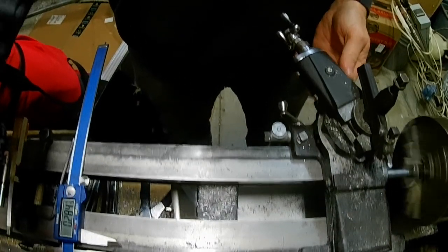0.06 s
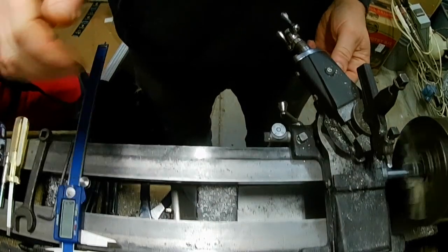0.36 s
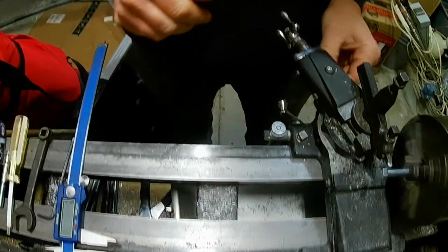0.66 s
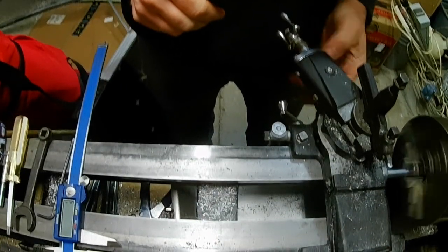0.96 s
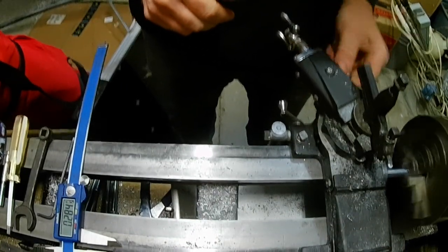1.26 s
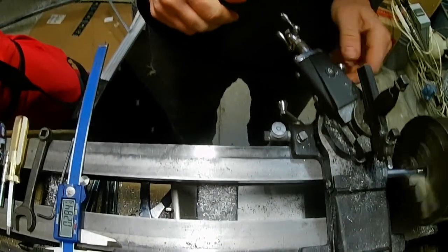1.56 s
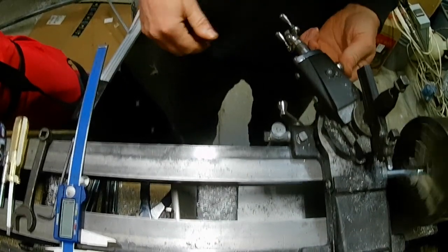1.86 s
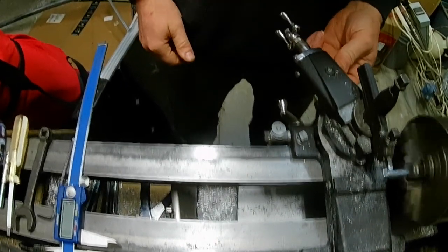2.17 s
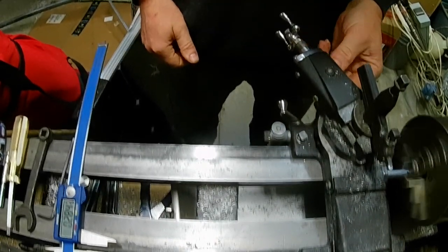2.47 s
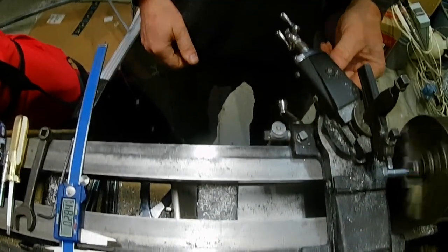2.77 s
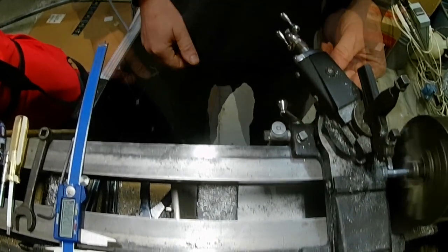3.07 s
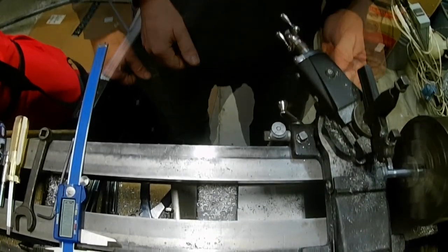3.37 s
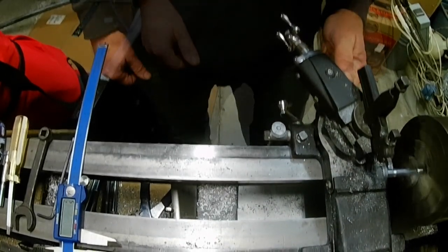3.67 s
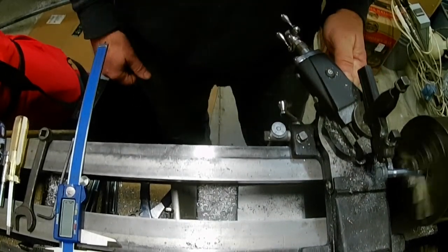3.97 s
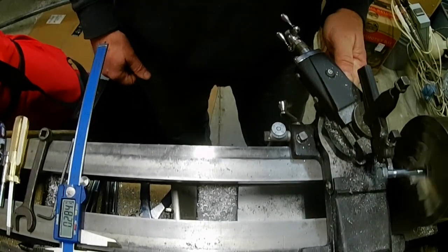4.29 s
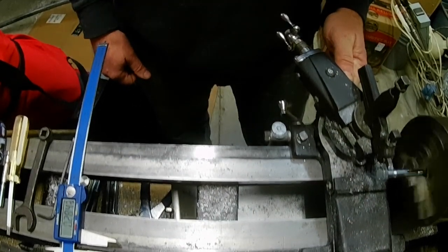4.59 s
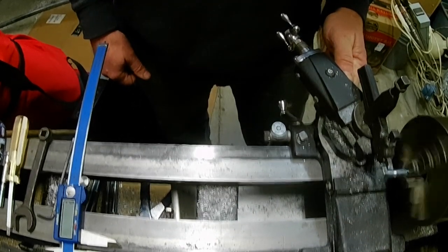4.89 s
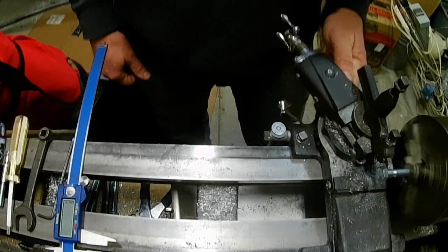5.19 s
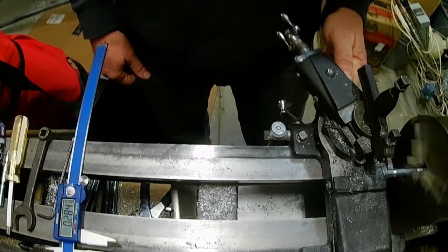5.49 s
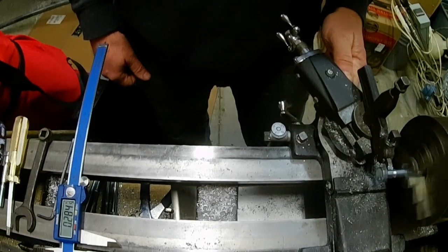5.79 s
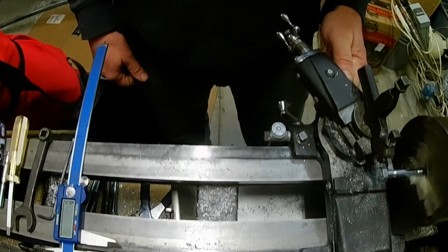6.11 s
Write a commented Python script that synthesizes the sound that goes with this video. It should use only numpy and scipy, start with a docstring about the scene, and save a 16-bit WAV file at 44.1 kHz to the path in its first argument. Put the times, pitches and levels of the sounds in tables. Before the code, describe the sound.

A belt-driven metal lathe runs for the whole six seconds or so in a small workshop, heard almost only on the left with a short, slight echo. From the start, the motor hums and whines beneath a fast, pulsing, boomy gear rattle. Irregular knocks, pings and bright ticks come through, the belt slaps about five times a second with a brief ringing chirp, and the bearings add a thin, high ring. From about 2.5 seconds, metal begins to rub, adding a hiss and a rough, falling squeak that repeats six or seven times a second. Between roughly 2.7 and 4 seconds, the boom and ticking recede and the rattle becomes duller. From 4 seconds the swishing rub and squeaks are stronger, with occasional gear clanks, clearest near 4.6 and 5.6 seconds. The lathe is still running at the end.

```python
"""A belt-driven metal lathe runs in a small workshop, heard almost only on the left.
From the start the motor hums and whines, and its pulsing pull and the turning shafts rattle the gears
in the cast metal bed. Bearings ring; the belt slaps once a lap and sets its pulley ringing.
From about 2.5 s something rubs, adding a hiss and a repeating, falling squeak. By about 4 s the boomy,
ticking first part has blended into a duller, squeaking second part, where a gear wheel clanks at times."""
import sys
import numpy as np
from scipy import signal
from scipy.fft import rfft, irfft, next_fast_len
from scipy.io import wavfile

SR = 44100
rng = np.random.default_rng(int(sys.argv[2]) if len(sys.argv) > 2 else 0)


def store_wav(level_fs):
    """Save 16-bit WAV to argv[1]."""
    pcm = np.round(np.clip(np.atleast_2d(level_fs), -1, 1) * 32767)
    wavfile.write(sys.argv[1], SR, pcm.T.astype(np.int16))


N = 275625
T = np.arange(N) / SR

# Things that turn. The high spot is the point of each turn that pushes hardest; the offset is how far
# the beat shifts between the two parts. Columns: turn_rate_hz, high_spot_s, second_part_offset_turns
MOTOR = (29.77, 1.3, .5)
COUNTERSHAFT = (24.38, 1.3, .17)
SPINDLE = (8.15, 1.283, .47)
BELT = (5.39, 1.21, 0)
RIPPLE_HZ = 120  # how often the motor's pull pulses
CONTACT_S = (2.46, 3.08)  # when the rubbing takes hold
BLEND_S = (2.7, 3.9)  # when the first part blends into the second

# All levels in the tables are relative: the functions scale them further.
# How strongly the gears rattle: time_s, level_db
RATTLE_LEVELS = [(0, -27), (2.6, -26.5), (3.05, -31), (3.8, -33), (4.03, -28.5), (6.25, -28.5)]
# Brief changes in the rattle, mostly swells: time_s, boost_db
RATTLE_SURGES = [(.062, 1.5), (.151, 1.5), (.452, 4), (1.06, 1), (1.467, 2.5), (1.578, 2), (1.665, -0.5),
                 (2.12, 1), (2.207, 2), (2.45, 2), (2.613, 5), (2.681, -0.5), (3.247, 2), (4.015, 2),
                 (4.3, 3), (4.38, 2), (5.002, 2.5), (5.039, 3), (5.408, 0.5), (6.075, 3), (6.144, -0.5)]
# The hardest gear knocks: start_s, level_db, decay_s
GEAR_KNOCKS = [(0.314, -18, .002), (.465, -17, 0.0017), (.649, -11, 0.0037), (.683, -11, 0.0034),
               (.849, -20, 0.0018), (.925, -11.5, .004), (1.039, -12, .002), (1.091, -12, 0.003),
               (1.257, -9, 0.0019), (1.423, -20, 0.0017), (1.572, -12.5, 0.0018), (1.7585, -12.5, 0.004),
               (1.7906, -13, 0.0034), (1.958, -11.5, 0.0018), (2.199, -9.5, 0.0061), (2.358, -14, 0.0037),
               (2.367, -10.5, 0.0046), (2.666, -13.5, 0.0033), (3.033, -16, 0.0024), (3.065, -15.5, 0.0045),
               (3.887, -20, 0.0017), (4.215, -18, .002), (4.592, -20, 0.0019), (4.792, -15.5, 0.0024),
               (5.7, -14, 0.0041), (6.138, -19, 0.0019)]
# How well the lathe's metal body passes on each pitch: pitch_hz, level_db
BED_COLOUR = [(25, -57.5), (60, -50.5), (100, -31.5), (140, -26.5), (300, -19.5), (450, -11), (520, -4),
              (900, -3.5), (1100, -0.5), (1400, -6.5), (2300, -9.5), (2900, -24.5), (5200, -38),
              (7200, -56), (10000, -70.5), (15000, -87)]
# Pitches that the body lifts or dips: pitch_hz, width_hz, boost_db
BED_MODES = [(243, 16, 7), (342, 11, 5), (524, 62, 3.5), (605.5, 21, 6), (990, 25, 5.5), (1211, 62, -4.5),
             (1254, 98, 10.5), (1700, 36, 0.5), (1920, 70, -3), (4730, 180, -7.5), (4860, 150, 10)]
# The broad boom of the stand in the first part: pitch_hz, width_hz, boost_db
STAND_MODES = [(126, 170, 7.5), (730, 490, 4)]
# The ringing notes of one gear wheel: pitch_hz, width_hz, level_db
WHEEL_MODES = [(1016, 45, -3), (1115, 43, 0)]
# That wheel's clanks in the second part: time_s, level_db
WHEEL_CLANKS = [(2.806, -25.5), (3.511, -21), (3.752, -28), (4.085, -25), (4.291, -32), (4.62, -21),
                (4.865, -27), (5.36, -29), (5.4, -26), (5.567, -24), (5.633, -20.5), (6.066, -33),
                (6.139, -24)]
# The clearest pings of a loose piece: start_s, level_db
LOOSE_PINGS = [(.182, -27), (.224, -24), (.484, -28.5), (.516, -26), (.726, -26), (1.059, -28.5),
               (1.332, -26.5), (1.499, -24.5), (1.698, -25), (2.029, -26.5)]
# Lone bright ticks: start_s, level_db
LONE_TICKS = [(.117, -31.5), (1.17, -27.5), (1.538, -29.5), (2.238, -44), (2.276, -28), (2.507, -29),
              (2.646, -31.5)]
# The tone colour of a tick: pitch_hz, level_db
TICK_COLOUR = [(700, -23.5), (1600, 10.5), (2700, 6.5), (3300, -5), (4000, -9), (5500, -22), (8000, -39.5),
               (12000, -73)]
# Pitches that ring in a tick: pitch_hz, width_hz, boost_db
TICK_MODES = [(1830, 89, 3.5), (2600, 240, 0.5), (3170, 33, 7), (4200, 130, 3.5), (5300, 130, 10)]
# Hard slaps of the belt: start_s, level_db
HARD_SLAPS = [(.158, -27.5), (.326, -20), (.899, -28), (1.093, -29.5), (1.268, -28.5), (1.434, -23.5),
              (1.634, -31.5), (1.799, -29.5), (2.2, -32.5), (2.377, -31), (2.542, -25.5), (2.743, -28.5),
              (2.941, -29.5), (3.242, -26), (4.1, -26), (4.235, -28.5), (4.433, -31), (4.6, -30.5),
              (4.84, -27.5), (5.13, -32), (5.21, -25.5), (5.344, -24)]
# The pulley's notes, each with its time to fade by 60 dB: pitch_hz, level_db, fade_s
PULLEY_MODES = [(1605, -9.5, 0.17), (1880, -13, 0.079), (1953, 2.5, 0.069), (2590, -16, 0.035),
                (3190, -21.5, 0.16), (4312, -28.5, .06), (5140, -27, .07)]
# How strongly the rubbing hisses: time_s, level_db
RUB_LEVELS = [(0, -67.5), (2.35, -69.5), (2.85, -56.5), (3.7, -55.5), (4.1, -50), (5.2, -52.5),
              (6.25, -52.5)]
# The tone colour of that hiss: pitch_hz, level_db
RUB_COLOUR = [(100, -49), (1500, -13.5), (2150, 19), (2380, 15.5), (2550, 9.5), (2850, 5), (3700, -0.5),
              (5000, 0.5), (5800, -3.5), (6300, -8.5), (7100, -9.5), (8400, -2.5), (9100, -25.5),
              (9700, -44), (11000, -42), (12000, -56.5)]
# Pitches that ring in that hiss: pitch_hz, width_hz, boost_db
RUB_MODES = [(3133, 120, 12), (4070, 70, 10), (5250, 110, 7), (6550, 190, 3.5)]
# Squeaks as the tight spot of the rubbing comes round: time_s, level_db, pitch_drop_hz
SQUEAKS = [(2.485, -32, 171), (2.64, -30.5, 169), (2.77, -31, 165), (2.951, -26.5, 190),
           (3.091, -31, 160.7), (3.249, -30, 188.3), (3.4, -30, 182), (3.475, -30.5, 83),
           (3.633, -37, 171.7), (3.796, -28, 199), (3.982, -27, 120.4), (4.105, -25, 208),
           (4.258, -28.5, 169.1), (4.403, -22.5, 161.3), (4.555, -23.5, 149.7), (4.72, -27.5, 240.4),
           (4.874, -25.5, 238.6), (5.031, -25.5, 228.7), (5.185, -30, 152.6), (5.336, -25, 218),
           (5.516, -28, 219.5), (5.65, -31.5, 120.2), (5.71, -31, 203), (5.82, -30, 225),
           (5.947, -30.5, 130), (6.106, -27, 196)]
# The motor's magnetic hum: multiple_of_ripple, level_db
HUM_TONES = [(1, -19.5), (2, 4), (3, -5.5), (4, -4), (6, -2), (7, -3.5)]
# The whine of the slots in the motor's spinning core: ripple_steps_from_centre, level_db
WHINE_TONES = [(-1, 1.5), (0, -0.1), (1, -4.5), (2, -8.5)]
# Faint notes of the gears: pitch_hz, level_db
GEAR_TONES = [(210.2, -15.5), (264.4, -16), (335.6, -10.5), (384.4, -19.5), (509.8, -6), (528.6, -2),
              (1320, -10)]
# The notes of the track that the bearing balls roll in: pitch_hz, width_hz, level_db
BEARING_MODES = [(3970, 75, 1.5), (4120, 29, -7.5), (4207, 50, -4.5), (4298, 36, 8.5), (4390, 55, 0.5)]
# The motor's high whistle near 8 kHz (rows above 10 kHz are too faint to hear):
# pitch_hz, width_hz, level_db
WHISTLE_MODES = [(7810, 16, 0), (8060, 25, -7), (7960, 17, 1.5), (8030, 18, -3.5), (7730, 330, -15),
                 (9050, 200, -24.5), (10600, 110, -31), (11000, 170, -29.5), (12400, 50, -39)]
# The tone colour of the faint hiss on the right: pitch_hz, level_db
RIGHT_HISS_COLOUR = [(30, -39), (100, -24), (300, -6), (1200, -1), (2500, -4.5), (8000, -22), (12000, -38)]


def gears(level_db, clashes_per_s=1200, scatter_db=1.3):
    """Loose teeth clash, hardest when a pulse of the motor meets the high spots of the shafts."""
    shafts = swing(MOTOR, lag_s=0.019) + swing(COUNTERSHAFT)
    ripple = np.cos(2 * np.pi * RIPPLE_HZ * T)
    surge_db = sum(boost * bell(s, width_s=0.012) for s, boost in RATTLE_SURGES)
    push_db = 0.65 * shafts + ripple * (0.8 + 0.35 * shafts) + 0.5 * swing(BELT, lag_s=0.044) + surge_db
    clashes = (rng.random(N) < clashes_per_s / SR) * rng.choice([-1, 1], N)
    clashes = unit(clashes * undb(scatter_db * rng.standard_normal(N)))
    wash = undb(-3) * rng.standard_normal(N)
    rattle = unit(undb(push_db) * (clashes + wash))
    force = undb(level_db) * rattle + undb(-13) * bursts(GEAR_KNOCKS)
    # the boom fades out as the second part blends in
    plain = colour(force, BED_COLOUR, BED_MODES)
    booming = colour(force, BED_COLOUR, BED_MODES + STAND_MODES)
    return blend(T) * plain + (1 - blend(T)) * booming


def gear_wheel(rattle_db, clank_hz=1075):
    """A wheel rings in throbs as the shafts push on it; later its teeth grind in rough clanks."""
    load_db = swing(MOTOR, lag_s=0.02) + 1.5 * swing(COUNTERSHAFT)
    load_db += 5.7 * blend(T) * swing(BELT, lag_s=0.13)
    ringing = unit(undb(load_db) * ring(WHEEL_MODES))
    grind = sum(undb(db) * bell(s + 0.0051, width_s=0.009) for s, db in WHEEL_CLANKS)
    clanks = grind * tone(clank_hz, 0.4 + flutter(130))
    return undb(rattle_db - 10.5) * ringing + undb(-5) * clanks


def shaft_knocks(shaft, level_db=-25, spread_db=1.3, second_part_db=-5):
    """Rows (start_s, level_db): a shaft knocks once a turn, just before the motor's nearest pulse."""
    hz, high_spot_s, offset_turns = shaft
    times = np.arange(high_spot_s % (1 / hz), T[-1], 1 / hz)
    times += offset_turns * blend(times) / hz
    times = np.round(times * RIPPLE_HZ) / RIPPLE_HZ - 0.001
    scatter = np.clip(rng.standard_normal(len(times)), -2, 2)
    levels = level_db + second_part_db * blend(times) + spread_db * scatter
    return [(s, db) for s, db in zip(times, levels) if 0 < s < T[-1]]


def thumps():
    """Knocks of the gears and shafts die away so fast that they sound dull."""
    hard = undb(-1.5) * strike(GEAR_KNOCKS, hz=1010, decay_s=0.00076)
    motor_shaft = strike(shaft_knocks(MOTOR), hz=1150, decay_s=0.001)
    countershaft = strike(shaft_knocks(COUNTERSHAFT), hz=857, decay_s=0.00051)
    return hard + motor_shaft + countershaft


def pings(strays_per_s=16, stray_db=-33, spread_db=4, second_part_db=-6):
    """Loose pieces ping: a few clear hits, and many stray ones that are softer in the second part."""
    gaps, sizes = rng.random((120, 2)).T
    times = np.cumsum(2 * gaps) / strays_per_s
    levels = stray_db + spread_db * (2 * sizes - 1) + second_part_db * blend(times)
    strays = [(s, db) for s, db in zip(times, levels) if s < T[-1]]
    return strike(LOOSE_PINGS, hz=2160, decay_s=0.0032) + strike(strays, hz=2298, decay_s=0.0028)


def ticks(slaps, slap_decay_s=0.0061, decay_s=0.005, bounce_s=0.028, second_part_db=-8):
    """Each belt slap makes a bright tick that bounces once, softer later on; a few ticks come alone."""
    first = [(s, db + second_part_db * blend(s), slap_decay_s) for s, db in slaps]
    bounces = [(s + bounce_s, db - 3, decay_s) for s, db, _ in first]
    hits = first + bounces + [(s, db, decay_s) for s, db in LONE_TICKS]
    return undb(1.4) * colour(bursts(hits) + undb(12.5) * clicks(hits), TICK_COLOUR, TICK_MODES)


def loose_pieces(slaps):
    """Thumps, pings and ticks together; small stiff pieces give off almost no bass."""
    cut_bass = signal.butter(2, 200, "high", fs=SR, output="sos")
    return signal.sosfilt(cut_bass, thumps() + pings() + ticks(slaps))


def belt_slaps(first_lap_s=0.155, light_db=-38, spread_db=1.5):
    """Rows (start_s, level_db): the hard slaps, plus a light one on every lap of the belt."""
    laps = np.arange(first_lap_s, T[-1], 1 / BELT[0])
    return HARD_SLAPS + list(zip(laps, light_db + spread_db * rng.standard_normal(len(laps))))


def belt_chirps(slaps, centre_hz=1915, rise_hz=110, low_hz=1642, lag_s=0.0047, width_s=0.0095):
    """The belt's stiff spot rides onto the pulley with a short rising chirp."""
    swells = [(s + lag_s, undb(db) * bell(s + lag_s, width_s)) for s, db in slaps]
    grip = sum(swell for _, swell in swells)
    # climbs through zero at the middle of each swell
    slide = sum((T - s) / width_s * swell for s, swell in swells) / (grip + np.exp(-20))
    chirp = tone(centre_hz + rise_hz * slide, 1 + 0.96 * flutter(210))
    low_note = undb(-7) * tone(low_hz, flutter(79))
    return undb(-5) * grip * (chirp + low_note)


def pulley(slaps, lag_s=0.003, rise_s=0.0047):
    """Each slap leaves the pulley ringing; the belt is soft, so the ring takes a moment to build."""
    t = T[:SR // 4]
    notes = sum(undb(db - 60 * t / fade_s) * np.sin(2 * np.pi * hz * t)
                for hz, db, fade_s in PULLEY_MODES)
    fade_in = 1 - np.exp(-(t / rise_s) ** 2)
    hits = clicks([(s + lag_s, db) for s, db in slaps])
    return undb(-5) * signal.oaconvolve(hits, notes * fade_in)[:N]


def rubbing(level_db, unbroken_from_s=3.3, whine_hz=5580):
    """Sliding metal hisses and whines: separate scrapes at first, then one unbroken, swishing rub."""
    tight_spot = sum(bell(s - 0.0055, width_s=0.032) for s, *_ in SQUEAKS)
    scrape_db = np.interp(T, CONTACT_S, (0, 1)) * (11 * tight_spot - 4.5)
    swish_db = 3 * tight_spot - 1
    flicker_db = 3 * np.real(flutter(30))
    pressure_db = np.where(T > unbroken_from_s, swish_db, scrape_db) + flicker_db
    hiss = undb(8) * colour(rng.standard_normal(N), RUB_COLOUR, RUB_MODES)
    whine = undb(-8) * tone(whine_hz, flutter(84))
    return undb(level_db + pressure_db) * (hiss + whine)


def squeaks(rub_db, pitch_hz=2555, waver_hz=50, cutoff_hz=2750):
    """The rubbing metal sings roughly; when the tight spot comes round it grows loud and sags in pitch."""
    sag_hz = sum(drop_hz * bell(s + 0.01655, width_s=0.025) for s, _, drop_hz in SQUEAKS)
    hz = pitch_hz - sag_hz + waver_hz * np.real(flutter(60))
    grip = sum(undb(db) * bell(s, width_s=0.02) for s, db, _ in SQUEAKS)
    roughness = 1 + 0.7 * flutter(170)
    # between squeaks the metal only catches in fits
    fits = unit(undb(2.1 * np.real(flutter(22))) * flutter(110))
    song = tone(hz, undb(-3.5) * grip * roughness + undb(rub_db + 13) * fits)
    return signal.sosfilt(signal.butter(10, cutoff_hz, fs=SR, output="sos"), song)


def motor(level_db, whine_hz=1429.3):
    """The motor's magnetism hums and its spinning slots whine, over a few faint gear notes."""
    # the second hum note throbs with each lap of the belt, more deeply in the second part
    throb = unit(undb((3 + blend(T)) * swing(BELT)))
    hum = sum(undb(db) * tone(k * RIPPLE_HZ, 1 + 0.24 * flutter(9.6)) * (throb if k == 2 else 1)
              for k, db in HUM_TONES)
    whine = sum(undb(db) * tone(whine_hz + k * RIPPLE_HZ, 1 + 0.6 * flutter(21))
                for k, db in WHINE_TONES)
    gear_notes = sum(undb(db) * tone(hz, flutter(2.4)) for hz, db in GEAR_TONES)
    return undb(level_db) * (undb(-3.5) * hum + undb(2) * whine + undb(-1) * gear_notes)


def bearing_slack_db(first_s=0.099, dip_db=-9):
    """The bearing goes slack, and so quieter, for a moment on every third spindle turn."""
    return dip_db * sum(bell(s, width_s=0.013) for s in np.arange(first_s, T[-1], 3 / SPINDLE[0]))


def bearings(level_db):
    """Balls tap their ringing track three to four times a motor turn, harder as the shafts push."""
    load_db = 3 * swing(SPINDLE, lag_s=-0.01) + 2 * swing(SPINDLE, per_turn=2)
    load_db += 2.5 * swing(MOTOR, lag_s=0.002) + bearing_slack_db()
    balls_db = 6 * swing(MOTOR, per_turn=4, lag_s=0.002) + 2.5 * swing(MOTOR, per_turn=3, lag_s=0.002)
    taps = undb(load_db + balls_db) * rng.standard_normal(N)
    track = sum(undb(db) * signal.lfilter(*signal.iirpeak(hz, hz / width, fs=SR), taps)
                for hz, width, db in BEARING_MODES)
    band = signal.butter(4, (3750, 4520), "band", fs=SR, output="sos")
    return undb(level_db) * unit(signal.sosfilt(band, track))


def whistle(level_db):
    """The motor's whistle near 8 kHz wavers with the shafts and dips when the bearing goes slack."""
    notes = ring(WHISTLE_MODES)
    sway_db = 3.5 * swing(SPINDLE) + 1.1 * swing(SPINDLE, per_turn=2, lag_s=0.0066)
    sway_db += 2 * swing(COUNTERSHAFT, lag_s=0.013) + bearing_slack_db() / 2
    waver_db = 3 * np.real(flutter(15))
    return undb(level_db) * unit(notes * undb(sway_db + waver_db))


def workshop(x, fade_s=0.28, echo_db=-13, delay_s=0.006):
    """The cluttered room adds a short wash of echoes."""
    t = T[:SR // 2]
    tail = rng.standard_normal(len(t)) * undb(-60 * t / fade_s) * (t > delay_s)
    return x + undb(echo_db) * signal.fftconvolve(x, tail / np.linalg.norm(tail))[:N]


def blend(s):
    """How far the sound has blended into its second part at time s, from 0 to 1."""
    return np.interp(s, BLEND_S, (0, 1))


def swing(turning, per_turn=1, lag_s=0):
    """The push of something that turns, swinging between -1 and 1."""
    hz, high_spot_s, offset_turns = turning
    turns = hz * (T - high_spot_s - lag_s) - offset_turns * blend(T)
    return np.cos(2 * np.pi * per_turn * turns)


def clicks(rows):
    """A one-sample click for each row (start_s, level_db, ...)."""
    out = np.zeros(N)
    for s, db, *_ in rows:
        out[int(s * SR)] += undb(db)
    return out


def strike(rows, hz, decay_s):
    """A note that quickly swells and dies, struck once for each row (start_s, level_db, ...)."""
    t = T[:SR // 10]
    note = t / decay_s * np.exp(1 - t / decay_s) * np.sin(2 * np.pi * hz * t)
    return signal.oaconvolve(clicks(rows), note)[:N]


def bursts(rows):
    """A sudden, fading flurry of metal contact for each row (start_s, level_db, decay_s)."""
    loudness = np.zeros(N)
    for s, db, decay_s in rows:
        after = loudness[int(s * SR):][:SR // 2]
        after += undb(db) * np.exp(-np.minimum(T[:len(after)] / decay_s, 30))
    return loudness * rng.standard_normal(N)


def ring(modes):
    """Notes kept ringing by friction, one for each row (pitch_hz, width_hz, level_db)."""
    return unit(sum(undb(db) * tone(hz, flutter(width)) for hz, width, db in modes))


def tone(hz, amplitude=1):
    """A single note at a fixed or moving pitch."""
    turns = np.cumsum(hz + np.zeros(N)) / SR + rng.random()
    return np.sqrt(2) * np.real(amplitude * np.exp(2j * np.pi * turns))


def flutter(width_hz):
    """A random wobble of strength and phase (complex numbers); a greater width wobbles faster."""
    step = 16
    size = next_fast_len(N // step + 2)
    hz = np.fft.fftfreq(size, step / SR)
    noise = rng.standard_normal(size) + 1j * rng.standard_normal(size)
    slow = np.fft.ifft(noise / (1 + (hz / width_hz) ** 2))
    return np.interp(T, np.arange(size) * step / SR, unit(slow))


def colour(x, points, modes=()):
    """Filter x with a smooth tone-colour curve, plus a bump for each mode (a pitch that rings)."""
    size = 8192
    grid_hz = np.maximum(np.arange(size // 2 + 1) * SR / size, 1)
    hz, db = np.transpose(points)
    db = np.interp(np.log(grid_hz), np.log(hz), db)
    for centre, width, boost in modes:
        db = db + boost / (1 + (2 * (grid_hz - centre) / width) ** 2)
    # build the filter so that it rings after a hit, never before
    cepstrum = irfft(np.log(undb(db)))[:size // 2]
    cepstrum[1:] *= 2
    response = irfft(np.exp(rfft(cepstrum, size)))
    return signal.fftconvolve(x, response / np.linalg.norm(response))[:N]


def bell(s, width_s):
    """A smooth, bell-shaped swell around time s."""
    out = np.zeros(N)
    near = slice(max(int((s - 5 * width_s) * SR), 0), int((s + 5 * width_s) * SR))
    out[near] = np.exp(-((T[near] - s) / width_s) ** 2)
    return out


def undb(db):
    """Turn decibels into a number to multiply by."""
    return 10 ** (np.asarray(db) / 20)


def unit(x):
    """Scale to an average strength (rms) of 1."""
    return x / np.sqrt(np.mean(np.abs(x) ** 2))


def scene():
    """The whole lathe on the left; only a trace of it and a faint hiss on the right."""
    rattle_db = np.interp(T, *np.transpose(RATTLE_LEVELS))
    rub_db = np.interp(T, *np.transpose(RUB_LEVELS))
    slaps = belt_slaps()
    contacts = gears(rattle_db) + gear_wheel(rattle_db) + loose_pieces(slaps)
    contacts += squeaks(rub_db) + belt_chirps(slaps) + pulley(slaps) + rubbing(rub_db)
    # motor, bearings and whistle get quieter while the rubbing comes in
    hold = np.interp(T, CONTACT_S, (0, 1))
    lathe = workshop(contacts) + motor(-42.5 - 5 * hold)
    lathe += bearings(rattle_db - 23 - 2.5 * hold) + whistle(rattle_db - 31.5 - 4.5 * hold)
    faint_hiss = undb(rattle_db - 35) * colour(rng.standard_normal(N), RIGHT_HISS_COLOUR)
    return np.array([undb(6) * lathe, undb(-43.5) * lathe + faint_hiss])


def record(dry, cutoff_hz=15100):
    """Cut off the very highest treble."""
    return signal.sosfilt(signal.ellip(8, .2, 70, cutoff_hz, fs=SR, output="sos"), dry)


dry = scene()
out = record(dry)
store_wav(out)
```